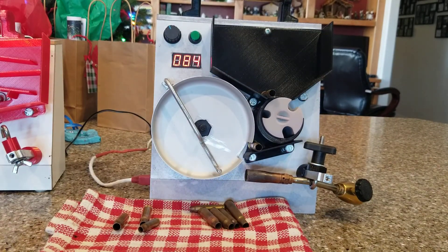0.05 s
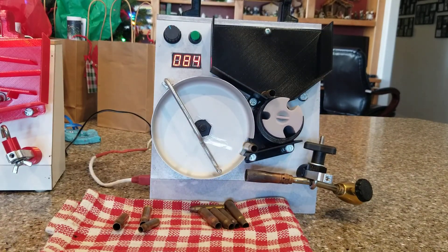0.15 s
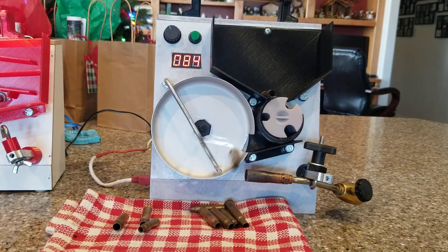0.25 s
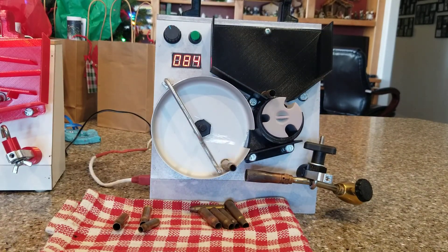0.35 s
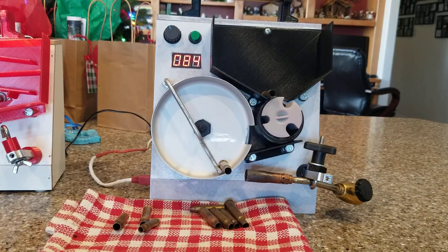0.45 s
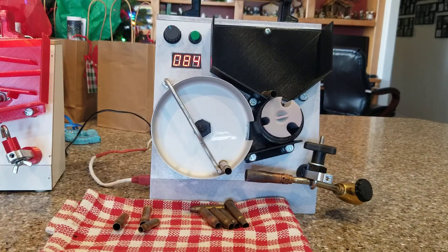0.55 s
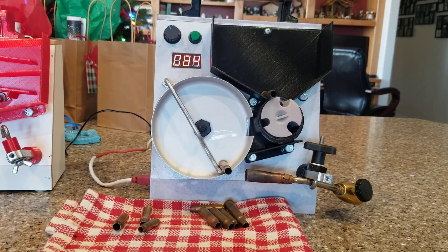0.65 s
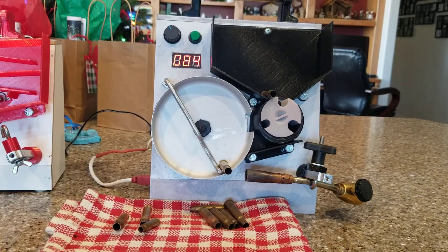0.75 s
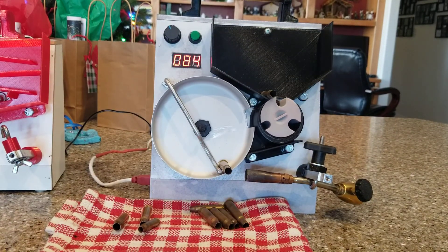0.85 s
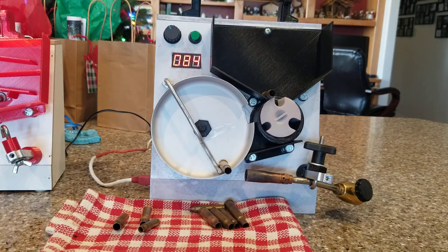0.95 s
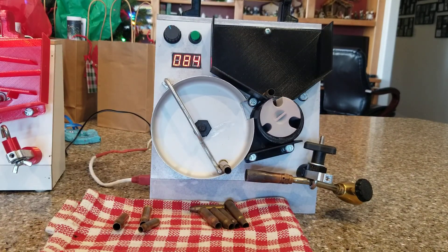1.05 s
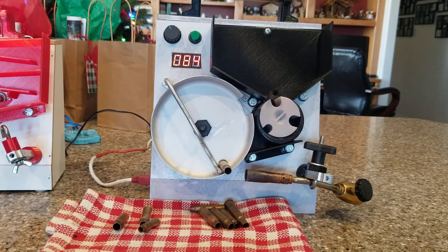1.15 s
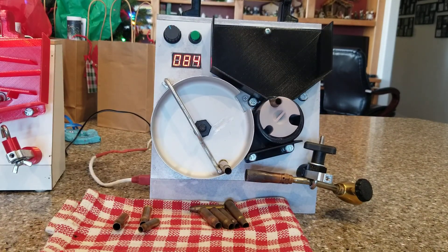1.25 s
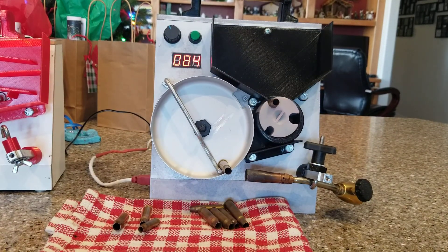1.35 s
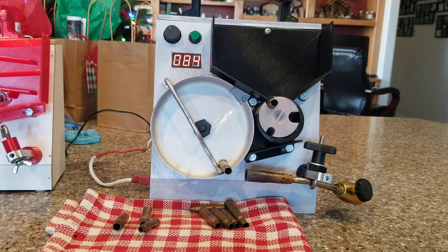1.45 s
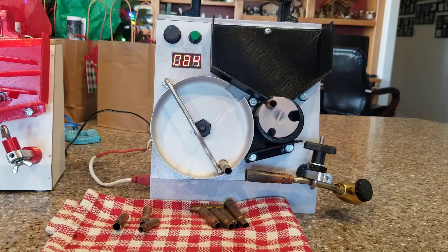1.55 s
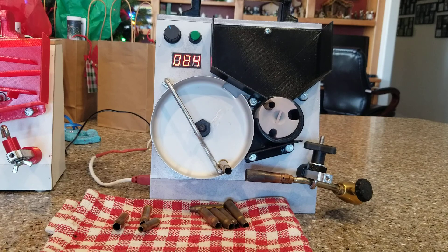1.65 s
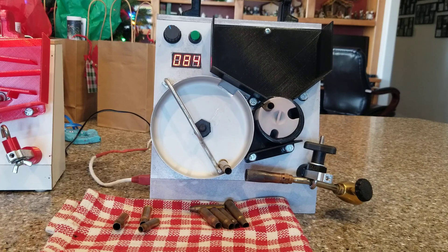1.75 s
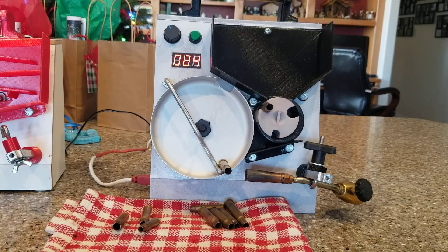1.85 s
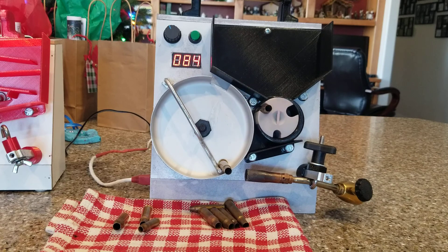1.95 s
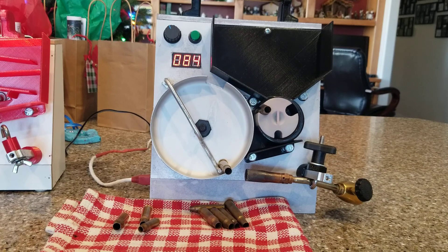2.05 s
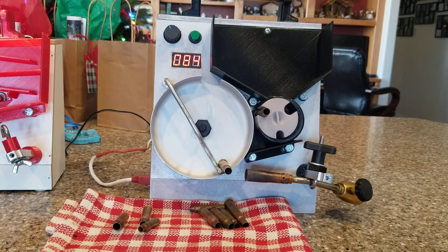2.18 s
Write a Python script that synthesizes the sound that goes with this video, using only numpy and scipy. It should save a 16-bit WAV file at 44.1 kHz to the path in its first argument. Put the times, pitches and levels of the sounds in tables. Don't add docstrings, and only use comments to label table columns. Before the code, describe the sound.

An empty brass cartridge case tumbles and rings into a metal pan beside a faintly humming motor

```python
import sys
import numpy as np
from scipy import signal
from scipy.fft import rfft, irfft, next_fast_len
from scipy.io import wavfile

SR = 44100
rng = np.random.default_rng(int(sys.argv[2]) if len(sys.argv) > 2 else 0)


def output_pcm(signal):
    pcm = np.clip(np.atleast_2d(signal).T, -1, 1) * 32767
    wavfile.write(sys.argv[1], SR, np.round(pcm).astype(np.int16))


def undo_db(level):
    steps = np.asarray(level, float) / 20
    return 10 ** steps


N = 97020

# frequency [Hz], level [dB].
AIR_COLOUR = [(30, -14), (90, 1.5), (400, -10.5), (2000, -11), (3600, -25), (6500, -34.5), (9500, -29),
              (12000, -22.5)]
# frequency [Hz], likeness [0-1].
AIR_LIKENESS = [(60, 0.87), (400, 0.1), (2000, 0), (6000, 0.2)]
# frequency [Hz], level [dB].
FAR_SHADOW = [(90, 1.5), (300, 1), (700, -5.5), (2000, -1.5), (3000, -17.5), (5500, -20.5), (9000, -31),
              (13000, -27)]
# frequency [Hz], width [Hz], level [dB].
MOTOR_HUM = [(474.3, 26, -69.5), (730, 26, -72.5), (863.4, 9.4, -72.5), (1964, 200, -68), (4150, 32, -84)]
# time [s], level [dB].
DRIVE_LOAD = [(0, -74.5), (.85, -66), (.95, -62.5), (1.1, -57.5), (1.65, -71.5), (1.74, -54), (1.81, -77),
              (1.86, -56), (1.92, -70), (2.01, -56.5), (2.1, -70.5)]
# time [s], level [dB].
WHINE_LEVEL = [(.1, -71.5), (.7, -79), (1.5, -69.5), (2.2, -64.5)]
# start [s], level [dB], frequency [Hz], t60 [s].
TOUCHES = [
    (1.124, -58.5, 4150, 0.39),
    (1.124, -59.5, 10450, 0.11),
    (1.539, -49, 12500, 0.0059),
    (1.576, -46.5, 12470, 0.0035),
    (1.637, -58.5, 11380, 0.0066),
]
# start [s], level [dB].
HOUSING_KNOCKS = [
    (.1115, -44),
    (0.118, -55),
    (0.139, -39),
    (0.153, -46.5),
]
# start [s], crack [dB], high ring [dB], low ring [dB], housing [dB].
FALL_BLOWS = [(0.2, -19.5, -53, -57.5, -37.5), (0.2101, -26.5, -43.5, -54.5, -51),
              (0.249, -32.5, -48.5, -49.5, -36.5), (0.2634, -18, -47.5, -36, -41),
              (0.279, -27.5, -40.5, -40.5, -52.5), (0.2874, -25, -23.5, -28, -42),
              (0.294, -24.5, -20.5, -38, -48.5), (0.3095, -24.5, -11, -21, -31.5),
              (.318, -34, -18.5, -47.5, -35), (0.3312, -23.5, -32, -41.5, -41),
              (0.352, -26, -17, -50, -40.5), (.371, -30, -22.5, -58, -45), (0.389, -36.5, -26, -36, -40.5),
              (.398, -32, -22.5, -41, -42), (0.42, -38, -42, -31, -41), (0.4312, -35, -17.5, -29.5, -45.5),
              (0.455, -49, -39, -72.5, -43)]
# start [s], level [dB], frequency [Hz], t60 [s].
SINGLE_CLINKS = [(0.2001, -24, 9000, 0.0095), (0.1996, -20.5, 6110, 0.018), (0.2078, -23, 4740, .02),
                 (0.2075, -30.5, 9500, 0.026), (.2475, -36.5, 2250, 0.034), (.2475, -37, 1660, .03),
                 (0.265, -22, 2083, .045), (.2632, -27.5, 1760, 0.024), (.2632, -24, 14500, .025),
                 (.2632, -34.5, 12500, 0.04), (.2632, -35.5, 13490, .04), (.279, -27, 12100, 0.053),
                 (.279, -27, 14850, .03), (0.288, -21.5, 9080, .03), (0.2868, -24, 3523, 0.039),
                 (0.295, -23.5, 9250, .03), (.294, -27.5, 11900, .04), (0.3096, -17.5, 9210, 0.035),
                 (0.3324, -25, 8337, 0.11), (0.334, -22.5, 11760, 0.039), (.3325, -24, 14520, .04),
                 (.351, -22, 14450, .04), (.351, -27, 11880, .04), (.360, -24.5, 11650, 0.064),
                 (0.372, -29, 11900, 0.037), (.389, -18.5, 9110, 0.016), (.389, -31, 3148, 0.057),
                 (0.388, -27.5, 1184, 0.046), (1.183, -34.5, 2400, .015), (1.183, -42, 3900, .015),
                 (1.184, -44, 9000, .015), (0.422, -22.5, 9130, 0.029), (.297, -38, 1480, .06),
                 (.3, -39, 6870, .1), (.443, -30, 8900, 0.043), (.69, -64.5, 6140, 0.035),
                 (1.216, -55, 2810, .015), (1.237, -55, 2400, .012), (1.2365, -47, 9200, .012),
                 (1.2419, -22.5, 2150, 0.0077), (1.249, -46, 2500, 0.01), (1.225, -32, 2600, .012),
                 (1.254, -55, 9300, .015)]
# start [s], level [dB].
PAN_BLOWS = [
    (0.2887, -29),
    (.296, -31),
    (0.3088, -45.5),
    (.3325, -39.5),
    (.361, -66),
    (0.395, -41),
    (0.42, -35.5),
]
# start [s], crack [dB], ring [dB], housing [dB].
SETTLE_BLOWS = [
    (1.179, -44, -77, -50.5),
    (1.181, -26.5, -45, -32.5),
    (1.187, -56, -72, -48),
    (1.198, -53, -61.5, -45),
    (1.215, -55, -70, -39.5),
    (1.2256, -23.5, -46.5, -50),
    (1.234, -47, -43, -34.5),
    (1.254, -64, -44.5, -67),
]
# frequency [Hz], level [dB], t60 [s].
HIGH_MODES = [(10451, -2, .23), (10067, -15, .3), (10718, -18, .12), (10520, -15, .1), (8290, -30, .3),
              (7905, -31, .22), (9884, -28, .12)]
LOW_MODES = [(2866, 0, .17), (2915, -7, .08), (3440, -16, .2), (3873, -15, .1)]
WHEEL_MODES = [(8441, -2, .16), (11210, 0, .2), (9394, -5, .03), (8893, -8, .05), (14600, -14, .04),
               (2600, -4, .02)]
CLINK_MODES = [(9270, 2, .025), (11900, 1, .03), (14500, -5, .03), (2070, -6, .03), (6870, -16, .06),
               (12500, -3, .02)]
PAN_MODES = [(4154, 0, .38), (13517, -5, .28)]
# frequency [Hz], level [dB], t60 [s].
HOUSING_MODES = [(325.84, -5, 0.28), (350, -9.5, 0.16), (425.2, 0.5, 0.057), (530.6, -8.5, 0.064),
                 (675, -6, 0.12), (719.5, -3.5, 0.14), (850, -8.5, .15), (1202, 0.5, 0.031),
                 (1484, 0, 0.042)]
# time [s], level [dB].
ROLL_LEVEL = [(.198, -115), (.21, -41), (.25, -49.5), (.28, -32.5), (.36, -41.5), (.45, -47), (.52, -53),
              (.66, -115)]
# time [s], level [dB].
SHUFFLE_LEVEL = [(1.172, -110), (1.178, -57), (1.185, -41.5), (1.215, -53.5), (1.25, -49.5), (1.3, -86),
                 (1.36, -81.5), (1.45, -110)]
# frequency [Hz], level [dB].
CHATTER_COLOUR = [(250, -23.5), (400, -7), (2400, -18), (4200, -11), (6700, -21.5), (9500, -11.5),
                  (14000, -18.5), (16000, -36.5)]
# start [s], attack [s], hold [s], t60 [s], frequency [Hz], level [dB].
COUNTER_SWELLS = [
    (.30, 0.05, 0.078, 0.3, 93.5, -37.5),
    (0.22, .02, 0.026, 0.15, 95, -57),
    (1.19, 0.01, 0.0078, .15, 112, -49.5),
    (1.232, 0.011, 0.013, 0.17, 93, -50.5),
    (1.4, 0.012, 0.011, .2, 85, -60),
    (1.175, .015, .01, .1, 200, -48),
    (1.228, 0.011, 0.0091, 0.13, 185, -51.5),
    (1.272, .015, 0.014, 0.1, 188, -57),
]
BLOW_SPREAD_DB, RING_SPREAD_DB = 2.5, 1.2


def rms_one(x):
    return x / np.sqrt(np.mean(x ** 2) + 1e-20)


def in_time(rows):
    return np.interp(np.arange(N) / SR, *np.transpose(rows))


def bin_hz():
    return np.arange(N // 2 + 1) * SR / N


def at_hz(points, hz):
    table = np.array(points)
    return np.interp(np.log(hz + 1), np.log(table[:, 0]), table[:, 1])


def colour(x, points):
    return irfft(rfft(x) * undo_db(at_hz(points, bin_hz())), N)


def band(x, low_hz, high_hz):
    return signal.sosfilt(signal.butter(3, [low_hz, high_hz], "band", fs=SR, output="sos"), x)


def drift(rate_hz):
    r = np.exp(-80 * np.pi * rate_hz / SR)
    noise = rng.standard_normal(N // 40 + 2002)
    slow = signal.lfilter([1], [1, -2 * r, r * r], noise)[2000:]
    return np.interp(np.arange(N) / 40, np.arange(len(slow)), rms_one(slow))


def smear(clicks, t60):
    return signal.lfilter([1], [1, -undo_db(-60 / (t60 * SR))], clicks)


def ring(clicks, hz, t60):
    r, w = undo_db(-60 / (t60 * SR)), 2 * np.pi * hz / SR
    return signal.lfilter([0, np.sin(w)], [1, -2 * r * np.cos(w), r * r], clicks + 1e-18)


def strike(times, dbs, modes, spread_db, loss_db=0.0):
    out = np.zeros(N + SR)
    hz, level_db, t60 = np.transpose(modes)[:, :, None]
    chance = rng.standard_normal((len(times), len(modes), 1))
    t = np.arange(int(1.2 * SR * t60.max())) / SR
    for s, db, luck in zip(times, dbs, chance):
        start = int(s * SR)
        later = np.searchsorted(times, s + t - 1e-4, "left") - np.searchsorted(times, s) - 1
        damp = np.minimum(undo_db(-loss_db * later), 1)
        swing = np.sin(2 * np.pi * hz * (t + start / SR))
        tone = undo_db(level_db + spread_db * luck - 60 * t / t60) * swing * (1 - np.exp(-hz * t))
        out[start:][:len(t)] += undo_db(db) * damp * tone.sum(axis=0)
    return out[:N]


def cracks(times, dbs, t60, tail_t60, tail_db):
    out, t = np.zeros(N + SR), np.arange(SR // 6) / SR
    for s, db, burst in zip(times, dbs, rng.standard_normal((len(times), len(t)))):
        fade = undo_db(db - 60 * t / t60) + undo_db(db + tail_db - 60 * t / tail_t60)
        out[int(s * SR):][:len(t)] += fade * burst
    return signal.lfilter([1, -.3], [1], band(out[:N], 915, 17000))


def floor():
    alike = np.clip(at_hz(AIR_LIKENESS, bin_hz()), 0, 1)
    mid, side = rfft(rng.standard_normal((2, N)))
    pair = irfft(np.sqrt(1 + alike) * mid + np.sqrt(1 - alike) * side * [[1], [-1]], N)
    return undo_db(-65) * rms_one(colour(pair, AIR_COLOUR))


def gear_teeth():
    tooth_rate = 45 * undo_db(3.7 * drift(1.4))
    teeth = np.diff(np.floor(np.cumsum(tooth_rate) / SR), prepend=0)
    teeth = teeth * undo_db(0.98 * rng.standard_normal(N))
    grains = smear(teeth, 0.037) * rng.standard_normal(N)
    return undo_db(-71.5) * rms_one(band(ring(grains, 3020, 0.014), 2500, 3600))


def motor():
    hum = np.zeros(N)
    for hz, width_hz, db in MOTOR_HUM:
        waver = undo_db(db + 3.55 * drift(1.318) + 1.5 * drift(17))
        hum += waver * rms_one(ring(rng.standard_normal(N), hz, 1.0 / width_hz))
    load_turns = np.cumsum(328 + 14 * drift(9.0)) / SR
    hum += undo_db(in_time(DRIVE_LOAD) + 1.23 * drift(8.9)) * np.sin(2 * np.pi * load_turns)
    whine_turns = np.cumsum(1176 + 70 * np.arange(N) / N + 4 * drift(12)) / SR
    hum += undo_db(in_time(WHINE_LEVEL) + 2.2 * drift(25)) * np.sin(2 * np.pi * whine_turns)
    return hum + gear_teeth()


def earlier_touch():
    return undo_db(-62 - 60 * np.arange(N) / SR / 0.38) * band(rng.standard_normal(N), 4000, 11000)


def housing_knocks():
    modes = [(450, 4, 0.03), (562, 5.5, 0.028), (752, 2.5, 0.023), (365, -8.5, .05)]  # Hz, dB, t60 s
    return band(strike(*np.transpose(HOUSING_KNOCKS), modes, BLOW_SPREAD_DB), 480, 1007)


def clinks():
    s, crack = np.transpose(FALL_BLOWS)[:2]
    out = strike(s, crack - 18, CLINK_MODES, BLOW_SPREAD_DB)
    for at, db, hz, t60 in SINGLE_CLINKS:
        out += strike([at], [db], [(hz, 0, t60)], 0)
    return out * (0.99 + 3.8 * band(rng.standard_normal(N), 47, 780))


def fall():
    s, crack, high, low, body = np.transpose(FALL_BLOWS)
    out = cracks(s, crack - 4, 0.0098, 0.1619, -12.5)
    out += band(cracks(s[:2], crack[:2] + 5.5, .015, 0.23, -13), 1500, 7000)
    out += strike(s, high, HIGH_MODES, RING_SPREAD_DB, 3)
    out += strike(s, low, LOW_MODES, RING_SPREAD_DB, 8.3)
    out += strike(*np.transpose(PAN_BLOWS), PAN_MODES, 0, 11.0)
    return out + strike(s, body, HOUSING_MODES, BLOW_SPREAD_DB, 4.7)


def chatter():
    hits = rng.random(N) < 2200 / SR
    heights = undo_db(4.3 * rng.exponential(1, N).clip(0, 2.8))
    clicks = hits * heights * rng.choice([-1, 1], N)
    grains = smear(np.abs(clicks), .008) * rng.standard_normal(N)
    rumble = rms_one(sum(undo_db(db) * ring(clicks, hz, .5 * t60) for hz, db, t60 in HOUSING_MODES))
    metal = HIGH_MODES + CLINK_MODES
    jingle = rms_one(sum(undo_db(db) * ring(clicks, hz, 0.41 * t60) for hz, db, t60 in metal))
    level = undo_db(in_time(ROLL_LEVEL)) + undo_db(in_time(SHUFFLE_LEVEL))
    rattle = level * (rms_one(colour(grains, CHATTER_COLOUR)) + undo_db(-0.5) * rumble)
    return rattle + undo_db(in_time(ROLL_LEVEL) - 0.5) * jingle


def boom():
    t, out = np.arange(N) / SR, np.zeros(N)
    for s, rise, hold, t60, hz, db in COUNTER_SWELLS:
        attack = np.sin(np.clip((t - s) / rise, 0, 1) * np.pi / 2) ** 2
        fade = undo_db(db - 60 * np.maximum(t - s - rise - hold, 0) / t60)
        out += attack * fade * np.sin(2 * np.pi * hz * t)
    return out


def ticks():
    out = np.zeros(N)
    for s, db, hz, t60 in TOUCHES:
        out += band(strike([s], [db], [(hz, 0, t60)], 0), hz / 2, min(hz * 2, 17000))
    return out


def settle():
    s, crack, high, body = np.transpose(SETTLE_BLOWS)
    out = band(cracks(s, crack - 1, 0.0052, 0.052, -33), 660, 12800)
    out += band(cracks(s, body + 10, 0.017, 0.059, -6.5), 1630, 2770)
    out += strike(s, high, WHEEL_MODES, RING_SPREAD_DB, 2.8)
    return out + strike(s, body, HOUSING_MODES[:4], BLOW_SPREAD_DB, 6.4)


def squeak():
    start_s, long_s, start_hz, end_hz = 1.433, 0.0097, 13900, 10840
    share = np.clip((np.arange(N) / SR - start_s) / long_s, 0, 1)
    hz = start_hz + (end_hz - start_hz) * share
    scrape = 0.4 * band(rng.standard_normal(N), 9000, 16900)
    return undo_db(-46.5) * np.sin(np.pi * share) * (np.sin(2 * np.pi * np.cumsum(hz) / SR) + scrape)


def room(x):
    t60_s, wall_cut_hz = 0.39, 6700
    size = next_fast_len(N + SR)
    w = 2 * np.pi * np.arange(size // 2 + 1) / size
    out, dull = np.zeros((2, len(w)), complex), np.exp(-2 * np.pi * wall_cut_hz / SR)
    wall = (1 - dull) / (1 - dull * np.exp(-1j * w))
    lags = (rng.uniform(.008, .035, 16) * SR).astype(int)
    for k, lag in enumerate(lags):
        loop = undo_db(-60 * lag / SR / t60_s) * np.exp(-1j * w * lag) * wall
        out[k % 2] += loop / (1 - loop) * (-1) ** (k // 2)
    return irfft(out * rfft(x, size), size)[:, :N]


def scene():
    hum = motor()
    metal = housing_knocks() + fall() + clinks() + settle() + chatter()
    metal = signal.sosfilt(signal.butter(5, 285, "high", fs=SR, output="sos"), metal)
    touches = metal + boom() + earlier_touch() + ticks() + squeak()
    shadow = np.array(FAR_SHADOW)
    shaded = colour(touches, shadow) + colour(hum, shadow * [1, 0.96])
    lag_s = 0.00015
    late = irfft(rfft(shaded) * np.exp(-2j * np.pi * lag_s * bin_hz()), N)
    left, right = undo_db(-13.5) * room(metal + hum)
    left = colour(left, shadow * [1, 0.68])
    return np.array([late + left, touches + hum + right]) + floor()


def band_limit(x):
    return signal.sosfilt(signal.butter(12, 17000, fs=SR, output="sos"), x)


def record(dry):
    mix = signal.sosfilt(signal.cheby2(10, 35, 16100, fs=SR, output="sos"), dry)
    return band_limit(mix)


dry = scene()
out = record(dry)
output_pcm(out)
```